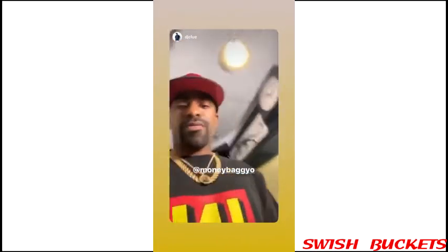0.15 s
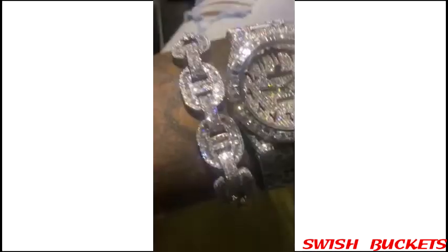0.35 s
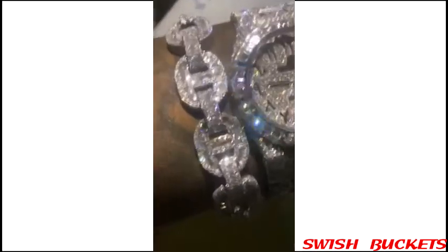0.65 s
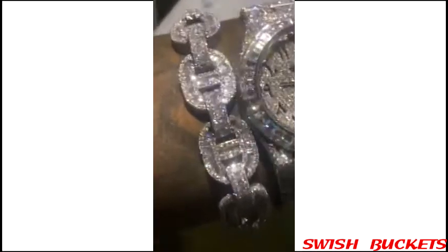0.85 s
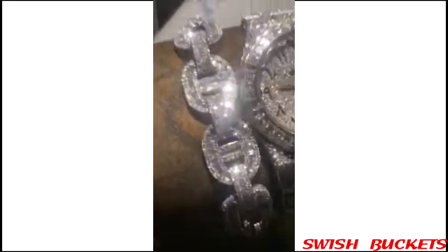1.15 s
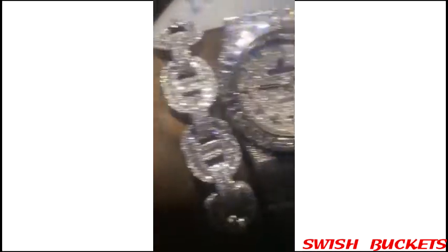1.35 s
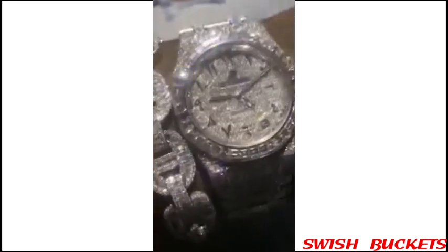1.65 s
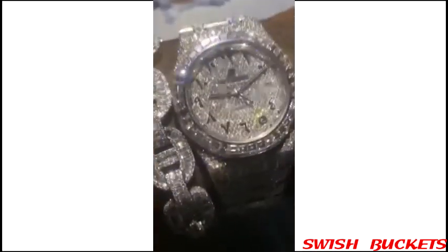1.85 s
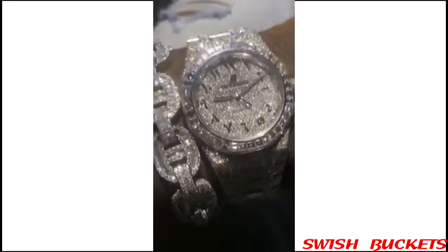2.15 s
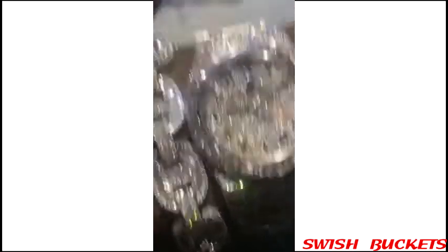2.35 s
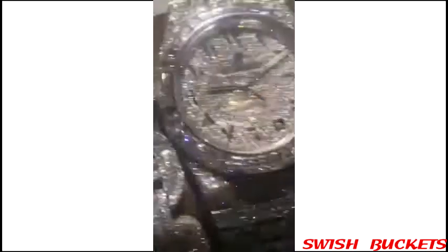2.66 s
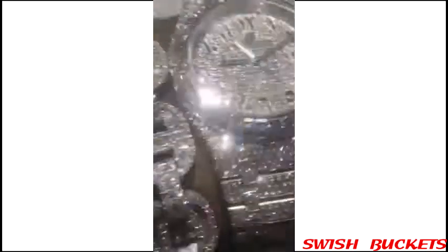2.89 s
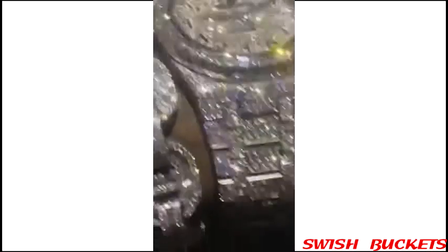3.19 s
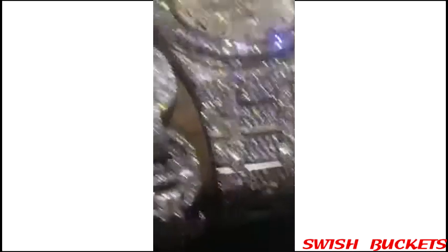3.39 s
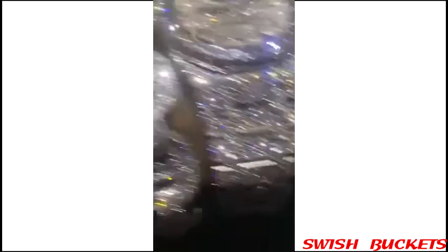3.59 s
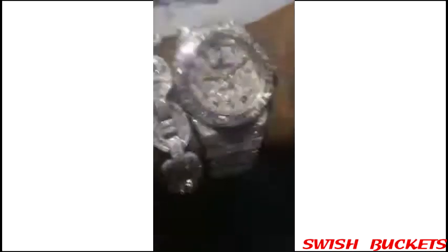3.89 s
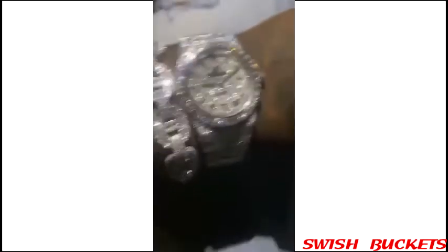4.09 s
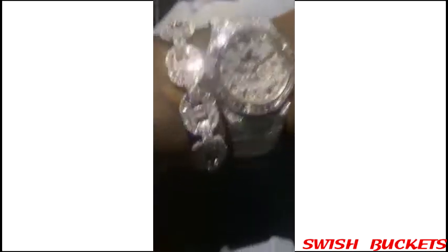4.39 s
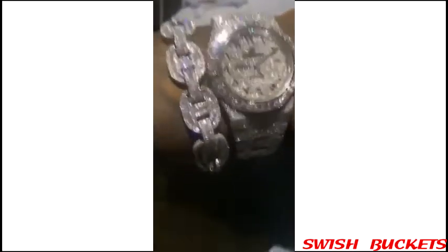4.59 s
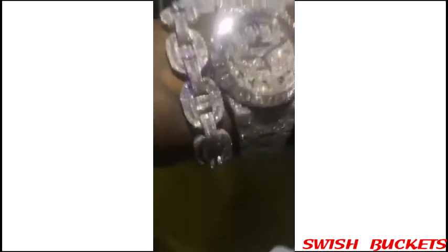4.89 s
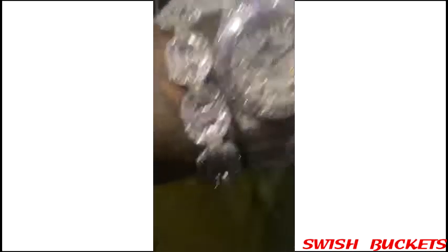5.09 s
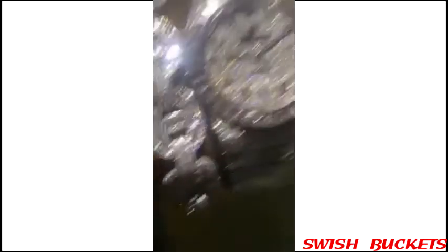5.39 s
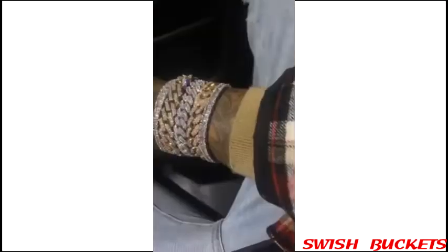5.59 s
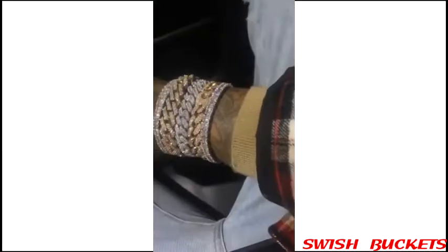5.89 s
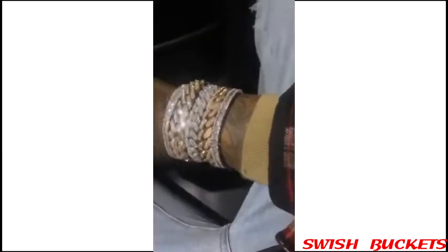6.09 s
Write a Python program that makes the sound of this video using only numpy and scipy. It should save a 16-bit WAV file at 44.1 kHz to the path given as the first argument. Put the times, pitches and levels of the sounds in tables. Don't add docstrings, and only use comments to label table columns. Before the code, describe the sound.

Low car engine drone and booming road rumble, with small metallic ticks and thumps, follow a quiet room moment; two brief silences split the sound.

```python
import sys
import numpy as np
from scipy import signal
from scipy.fft import rfft, irfft, next_fast_len
from scipy.io import wavfile
from scipy.ndimage import uniform_filter1d, map_coordinates

SR = 44100
rng = np.random.default_rng(int(sys.argv[2]) if len(sys.argv) > 2 else 0)


def attenuation_scalar(level_db):
    decades = np.asarray(level_db, float) / 20
    return 10 ** decades


def generate_wav(signal):
    frames = np.transpose(np.atleast_2d(signal))
    scaled = np.clip(frames, -1, 1) * 32767
    pcm = np.round(scaled).astype(np.int16)
    wavfile.write(sys.argv[1], SR, pcm)


N = 275625

# start in seconds, end in seconds.
PARTS = [
    (0, .279),
    (.4041, 5.4635),
    (5.5969, 7),
]
# time in seconds, size in full scale, time constant in seconds.
JOLTS = [
    (.4041, 0.028, 0.0023),
    (5.4635, -0.11, .004),
]

# time in seconds, level in dB.
HALL_LEVEL = [
    (0.0, -43),
    (0.036, -44),
    (0.056, -44.5),
    (0.068, -46.5),
    (0.082, -43),
    (0.275, -46.5),
]
# frequency in Hz, density in dB per Hz.
HALL_COLOUR = [(15, -32), (25, -13.5), (74, 4.5), (129, -8), (292, -7.5), (343, -13), (446, -19.5),
               (738, -25), (3800, -34.5), (4110, -39), (7760, -37), (13900, -49)]

# time in seconds, level in dB.
BOOM_LEVEL = [
    [(0.41, -33), (0.45, -28.5), (0.99, -21.5), (1.24, -28), (1.29, -34), (1.52, -26.5), (1.8, -30.5),
     (1.96, -26.5), (2.07, -29.5), (2.38, -26.5), (2.46, -29), (2.96, -30), (3.24, -24.5), (3.31, -30),
     (3.48, -23), (3.74, -31), (3.84, -25.5), (4.04, -35.5), (4.36, -26), (4.43, -28), (4.67, -24.5),
     (4.87, -32), (5.09, -27), (5.46, -29.5)],
    [(5.6, -29), (5.824, -25.5), (5.876, -29), (5.952, -25), (6.006, -27), (6.25, -32.5)],
]
# frequency in Hz, density in dB per Hz.
BOOM_COLOUR = [(11, -38), (18, -9.5), (27, -4.5), (76, 3), (100, -5.5), (114, -8), (136, -13), (170, -19),
               (220, -54.5), (370, -120)]
# time in seconds, tyre level in dB, air level in dB.
ROAD_LEVEL = [
    [(0.41, -38.5, -45), (0.45, -37, -44.5), (0.48, -36.5, -53.5), (1.49, -35, -46), (1.53, -37, -52.5),
     (2.0, -35.5, -54), (2.04, -37.5, -52), (2.07, -31.5, -59), (2.11, -38.5, -55), (2.3, -33, -50.5),
     (2.81, -36, -53.5), (3.01, -36.5, -55.5), (3.04, -32, -47), (3.05, -34, -53), (3.53, -36.5, -52.5),
     (3.62, -32.5, -47.5), (3.7, -37.5, -54), (3.86, -30.5, -53), (3.88, -31, -45), (3.9, -36, -58),
     (4.04, -37, -47), (4.07, -41, -54.5), (4.16, -33, -52), (4.23, -25, -53), (4.37, -37, -54),
     (4.41, -33.5, -50.5), (4.67, -37, -54.5), (4.77, -31.5, -47.5), (4.83, -38, -54.5),
     (4.86, -33.5, -52.5), (4.9, -37, -46), (4.93, -34, -52.5), (5.3, -36, -53), (5.43, -35, -49.5)],
    [(5.61, -36, -58), (5.878, -34, -47.5), (5.888, -36, -47), (5.902, -35.5, -50), (6.022, -34.5, -49),
     (6.194, -35, -50), (6.22, -34.5, -47.5)],
]
# frequency in Hz, density in dB per Hz.
TYRE_COLOUR = [(71, -38.5), (120, -3.5), (193, -10), (251, -10), (279, -12.5), (362, -11.5), (658, -22.5),
               (791, -20.5), (853, -23.5), (1600, -34), (2080, -49), (3520, -120)]
# frequency in Hz, density in dB per Hz.
AIR_COLOUR = [(760, -28), (1300, -0.5), (1600, -8.5), (1790, -3), (2260, -1), (3050, -9.5), (4710, -11.5),
              (8290, -23.5), (10800, -36.5), (12300, -30.5), (13900, -43)]
# frequency in Hz, density in dB per Hz.
NEAR_VENT_COLOUR = [(760, -41), (1300, -30.5), (1620, -3), (2290, 2.5), (2680, 1), (5520, -16.5),
                    (7360, -23.5), (11300, -35), (12300, -29), (13900, -43)]

# start in seconds, level in dB, panel resonance in Hz,
# fade in seconds, sharpness of the resonance (Q, no unit).
BUMPS = [
    (2.05, -31, 200, 0.06, 8.4),
    (3.56, -41.5, 1200, 0.031, 4),
    (3.77, -31.5, 360, 0.1, 6.9),
    (3.85, -36.5, 590, 0.068, 5.3),
    (4.14, -33.5, 390, 0.065, 7.5),
    (3.3, -40, 2080, 0.017, 25),
    (.82, -46.5, 1100, 0.024, 20),
    (2.9, -53, 4600, 0.22, 9.9),
    (6.05, -36, 277, .1, 5.7),
    (.548, -34, 660, .01, 1.5),
]
# start in seconds, peak level in dB, ring in Hz, 60 dB decay in seconds.
TICKS = [(0.0094, -41, 4340, 0.042), (0.1485, -46.5, 3630, 0.061), (0.412, -38, 3560, 0.042),
         (0.4403, -41.5, 3570, 0.033), (0.5462, -41, 3640, 0.038), (0.6234, -50, 4250, 0.042),
         (0.6724, -45, 4600, 0.059), (0.7547, -47, 4940, 0.039), (0.8713, -46.5, 4440, 0.043),
         (1.0023, -44, 3534, 0.038), (1.0238, -43, 3520, 0.054), (1.111, -47, 4570, 0.053),
         (1.1974, -50, 3550, 0.053), (1.489, -48.5, 4430, 0.038), (1.5264, -44, 3680, 0.036),
         (1.56, -49, 4190, 0.048), (1.633, -52, 5120, 0.047), (1.705, -50.5, 4720, 0.05),
         (1.7728, -46, 4930, 0.05), (1.9555, -47.5, 4760, 0.05), (1.9987, -47, 3520, 0.047),
         (2.0417, -44, 4510, 0.05), (2.2356, -50, 4553, 0.05), (2.3217, -46.5, 4740, 0.039),
         (2.368, -47, 4570, 0.054), (2.3974, -45, 4763, 0.055), (2.411, -41, 4700, 0.046),
         (2.4525, -48, 4660, 0.04), (2.61, -46, 4620, 0.048), (2.7182, -49, 3860, 0.049),
         (2.9566, -47.5, 4028, 0.05), (3.0227, -46, 4500, 0.051), (3.1726, -46.5, 4757, 0.05),
         (3.2799, -46, 4188, 0.047), (3.3618, -45.5, 4180, 0.05), (3.3896, -49, 4570, 0.056),
         (3.4678, -49, 4326, 0.047), (3.7635, -48, 4355, 0.047), (3.8714, -49.5, 4610, 0.046),
         (4.0395, -50, 4090, 0.042), (4.0993, -46.5, 4780, 0.047), (4.1782, -53.5, 4560, 0.05),
         (4.373, -45, 3940, 0.049), (4.3978, -43.5, 4323, 0.047), (4.459, -45, 4787, 0.047),
         (4.5042, -43.5, 3666, 0.058), (4.533, -41.5, 3590, 0.053), (4.7074, -46.5, 4680, 0.045),
         (4.7694, -44, 5054, 0.049), (4.8677, -42, 3850, 0.05), (4.8922, -42.5, 5257, 0.051),
         (5.1472, -44.5, 4400, 0.053), (5.2684, -47.5, 4650, 0.05), (5.446, -38.5, 5000, 0.049),
         (5.7175, -47, 3710, 0.068), (5.884, -36, 3830, 0.05), (5.9415, -47.5, 4020, 0.05),
         (6.0874, -38, 4000, 0.026), (6.1542, -50, 3630, 0.05)]

# time in seconds, firing rate in Hz, drone level in dB.
ENGINE_REVS = [
    [(0.4, 77.4, -26.5), (0.65, 80.1, -28), (0.75, 76.7, -26.5), (0.78, 77.4, -26), (0.86, 90.83, -27.5),
     (0.98, 104.3, -31), (1.05, 109.3, -28.5), (1.3, 95.4, -24), (1.57, 90.5, -25), (2.4, 78.47, -26.5),
     (2.77, 83.5, -27.5), (2.99, 87.9, -24), (3.11, 98.1, -27.5), (3.3, 99.2, -24.5), (3.56, 96.5, -25.5),
     (3.77, 91.86, -29.5), (3.87, 97.65, -25), (3.96, 97.6, -27.5), (4.08, 89.6, -32), (4.16, 89.7, -29.5),
     (4.28, 84.8, -26), (4.44, 90.76, -29.5), (4.97, 88.1, -29.5), (5.46, 88.1, -28.5)],
    [(5.6, 101.2, -25.5), (5.902, 99.2, -25.5), (6.092, 92.6, -25), (6.176, 89.7, -26.5), (6.25, 86.8, -28)],
]
# multiple of the firing rate, level in dB.
SHAFT_ORDERS = [(.5, -10.5), (0.641, -10.5), (2.001, -25.5)]


def unit(x):
    return x / np.sqrt(np.mean(x ** 2) + 1e-20)


def curves(rows):
    s, *cols = np.transpose(rows)
    return [np.interp(np.arange(N) / SR, s, c) for c in cols]


def wobble(rate):
    knots = rng.standard_normal(int(N * rate / SR) + 4)
    return map_coordinates(knots, [np.arange(N) * rate / SR])


def rush(colour, patchy_db):
    grains = signal.stft(rng.standard_normal(N + 512), nperseg=512)[2]
    patches = uniform_filter1d(rng.standard_normal(grains.shape), size=6, axis=0)
    patches = unit(uniform_filter1d(patches, size=10, axis=1))
    noise = signal.istft(grains * attenuation_scalar(patchy_db * patches), nperseg=512)[1][:N]
    m = next_fast_len(N)
    hz, db = np.transpose(colour)
    gain = attenuation_scalar(np.interp(np.log(np.fft.rfftfreq(m, 1 / SR) + 1), np.log(hz + 1), db))
    return unit(irfft(rfft(noise, m) * gain, m)[:N])


def hall():
    level_db, = curves(HALL_LEVEL)
    t = np.arange(N) / SR
    room = attenuation_scalar(level_db + 2.5) * rush(HALL_COLOUR, patchy_db=2.0)
    tail_colour = [(100, -27.5), (300, 3), (900, -9), (2500, -27), (14000, -61)]  # (Hz, dB per Hz)
    reverberation = attenuation_scalar(-31 - 60 * t / 0.17) * rush(tail_colour, patchy_db=4.5)
    hum = attenuation_scalar(-45.5) * np.sin(2 * np.pi * 82 * t) + attenuation_scalar(-47.5) * np.sin(2 * np.pi * 59 * t)
    return room + reverberation + hum


def cabin_boom():
    boom_db, = curves(np.vstack(BOOM_LEVEL))
    return attenuation_scalar(boom_db + 1.93 + 0.39 * wobble(8)) * rush(BOOM_COLOUR, patchy_db=0.06)


def tyres_and_air():
    tyre_db, air_db = curves(np.vstack(ROAD_LEVEL))
    shake = wobble(14)
    tyres = attenuation_scalar(tyre_db + 0.54 * shake) * rush(TYRE_COLOUR, patchy_db=0.34)
    vent_near = np.arange(N) / SR > PARTS[2][0] - .05
    air = np.where(vent_near, rush(NEAR_VENT_COLOUR, patchy_db=0.0), rush(AIR_COLOUR, patchy_db=1.5))
    flutter_db = 0.78 * shake + 0.6 * wobble(35)
    return tyres + attenuation_scalar(air_db + 0.42 + flutter_db) * air


def crackle():
    chance, size = rng.random(N), rng.exponential(size=N)
    grit = (chance < 180 / SR) * attenuation_scalar(5.2 * size)
    band = signal.butter(1, [2500, 9000], "band", fs=SR, output="sos")
    return attenuation_scalar(-68) * unit(signal.sosfilt(band, grit))


def bumps():
    out, t = np.zeros(N + SR), np.arange(SR // 2) / SR
    for s, db, hz, fade, sharpness in BUMPS:
        panel = signal.lfilter(*signal.iirpeak(hz, abs(sharpness), SR), rng.standard_normal(len(t)))
        onset = 1 - np.exp(-t / (0.24 * fade))
        shape = attenuation_scalar(db + 4.5 - 20 * (t / fade) ** 2) * onset
        out[round(s * SR):][:len(t)] += shape * unit(panel)
    return out[:N]


def rattles():
    out, t = np.zeros(N + SR), np.arange(SR // 8) / SR
    broad = signal.butter(1, [2500, 8000], "band", fs=SR, output="sos")
    onset = 1 - np.exp(-t / 0.0069)
    for s, db, hz, t60 in TICKS:
        scratch = unit(signal.sosfilt(broad, rng.standard_normal(len(t))))
        ring = unit(signal.lfilter(*signal.iirpeak(hz, 4.5, SR), scratch))
        shape = attenuation_scalar(db - 60 * t / abs(t60)) * onset
        out[round(s * SR):][:len(t)] += shape * (scratch + 0.73 * ring)
    return out[:N]


def engine():
    firing_hz, drone_db = curves(np.vstack(ENGINE_REVS))
    turn = 2 * np.pi * np.cumsum(firing_hz) / SR
    drone = attenuation_scalar(0.93 * wobble(14)) * np.sin(turn + 0.33 * wobble(9))
    for multiple, db in SHAFT_ORDERS:
        swell = attenuation_scalar(db + 4 * wobble(3.01))
        drone = drone + swell * np.sin(multiple * turn + 0.62 * wobble(6))
    return np.sqrt(2) * attenuation_scalar(drone_db) * drone


def scene():
    car = cabin_boom() + tyres_and_air() + crackle() + bumps() + engine()
    in_hall = np.arange(N) / SR < PARTS[1][0] - .05
    return (np.where(in_hall, hall(), car) + rattles())[None]


def low_pass(x):
    return signal.sosfilt(signal.butter(12, 14030, fs=SR, output="sos"), x)


def record(dry):
    t = np.arange(N) / SR
    playing = uniform_filter1d(sum(1. * (t >= a) * (t < b) for a, b in PARTS), size=5)
    hall_fade = np.clip((PARTS[0][1] - t) / 0.01, 0, 1)
    fade = np.where(t < PARTS[1][0] - .05, hall_fade, 1)
    jolts = sum(size * np.exp(-abs(t - s) / tau) for s, size, tau in JOLTS)
    after = t - PARTS[1][1]
    smear = (after >= 0) * (after < .036) * attenuation_scalar(-29 - 1100 * np.clip(after - .012, 0, 1))
    mix = (dry + jolts) * playing * fade + dry * smear
    return low_pass(mix)


dry = scene()
out = record(dry)
generate_wav(out)
```